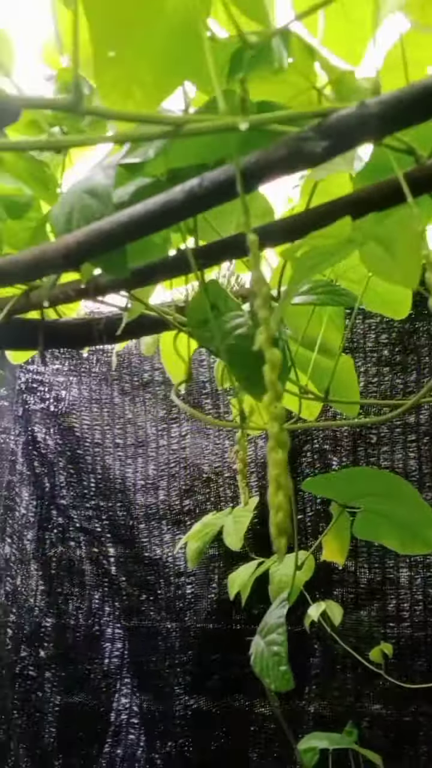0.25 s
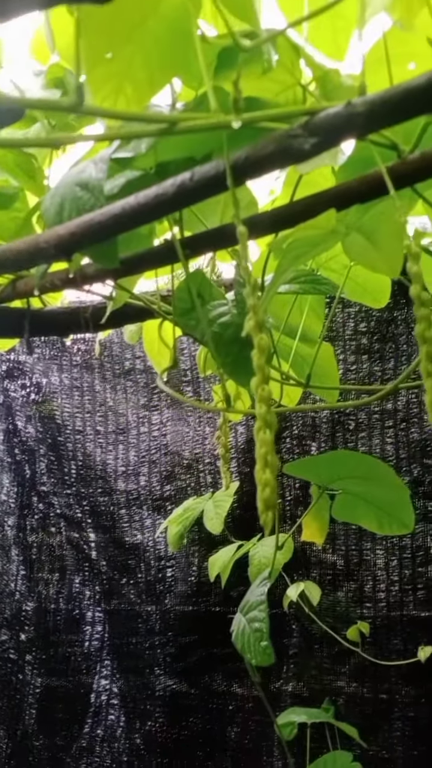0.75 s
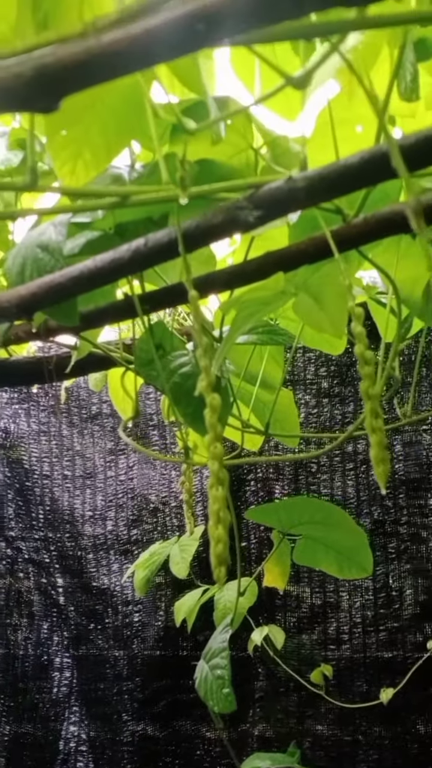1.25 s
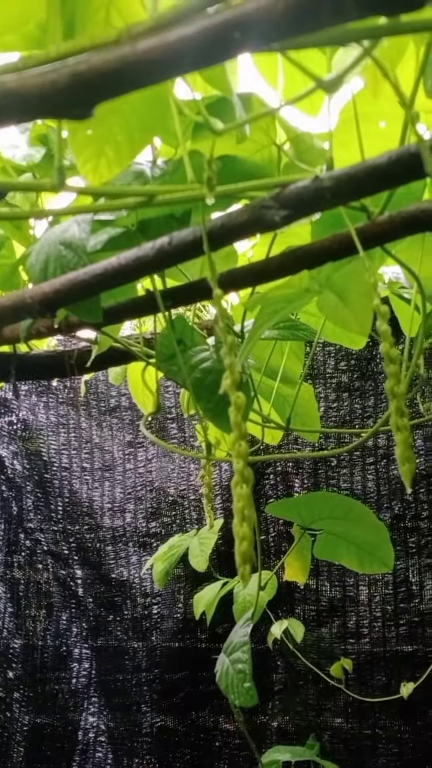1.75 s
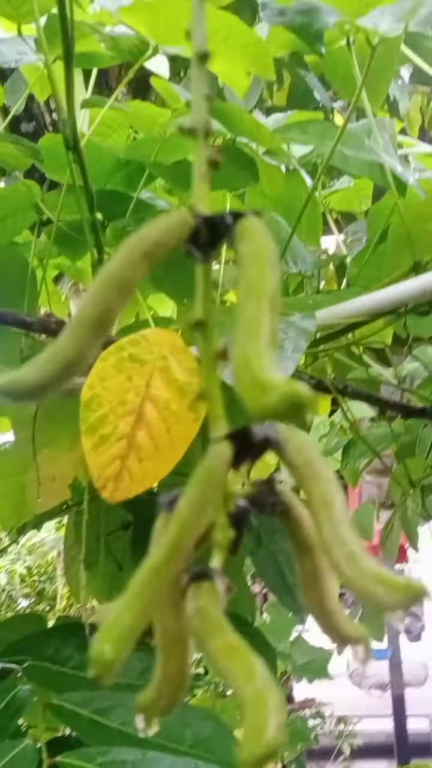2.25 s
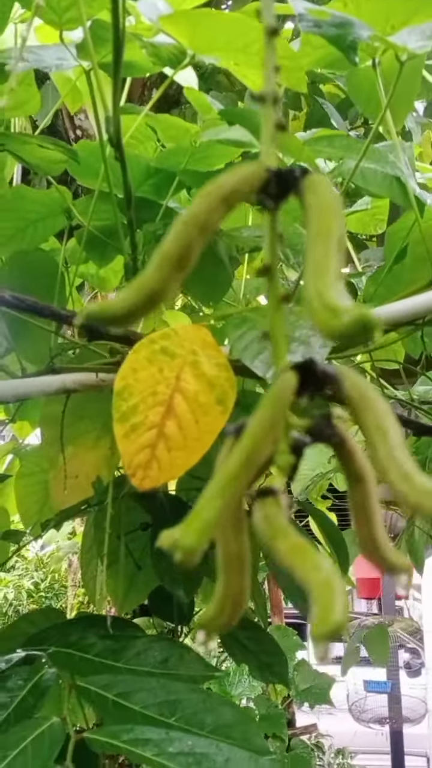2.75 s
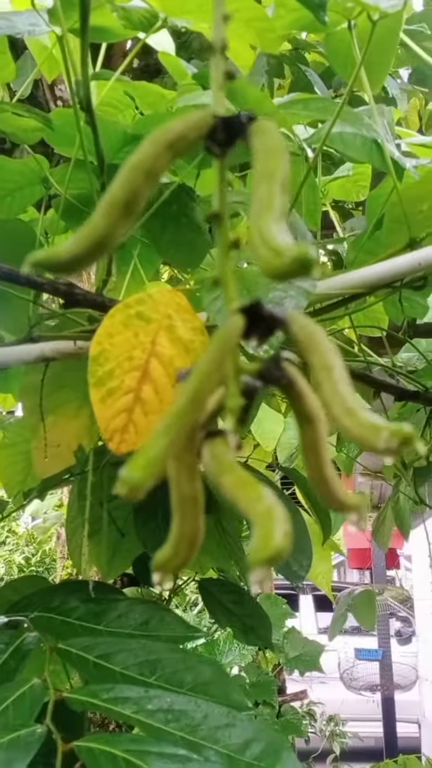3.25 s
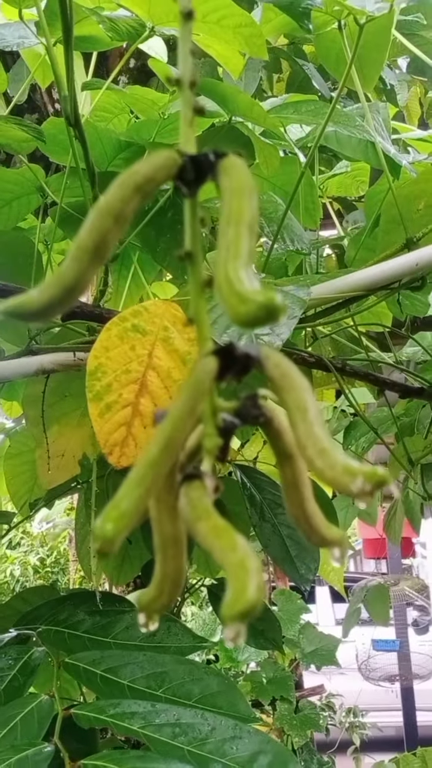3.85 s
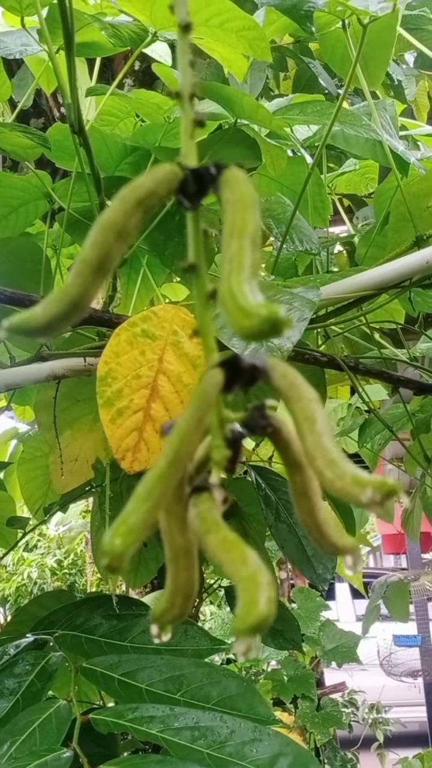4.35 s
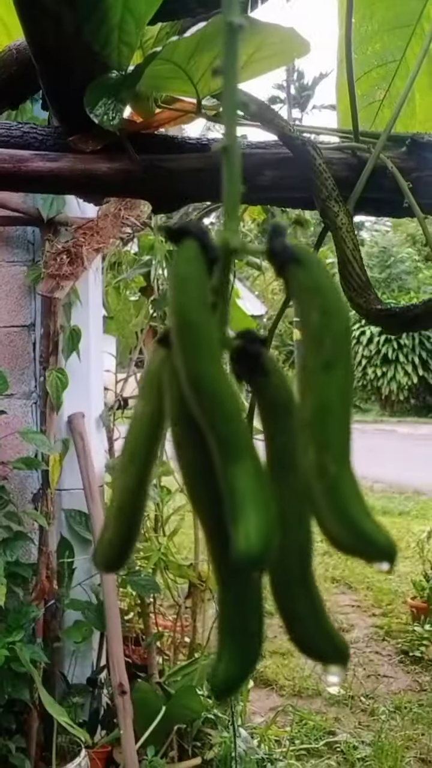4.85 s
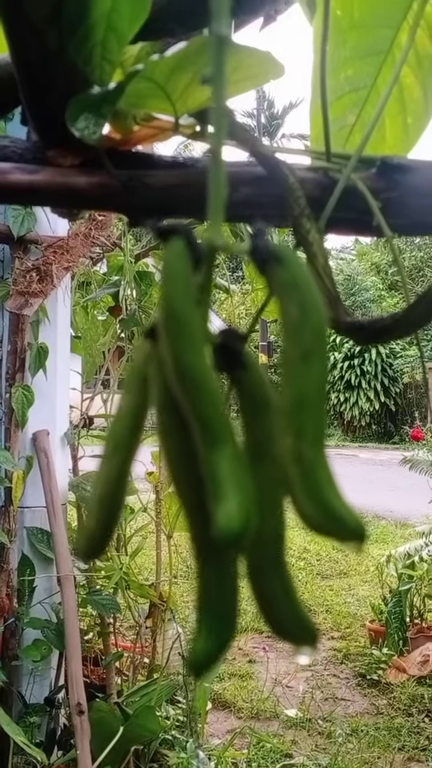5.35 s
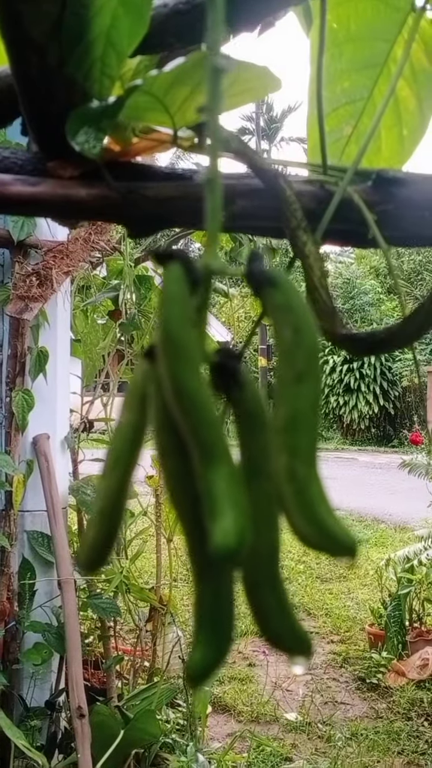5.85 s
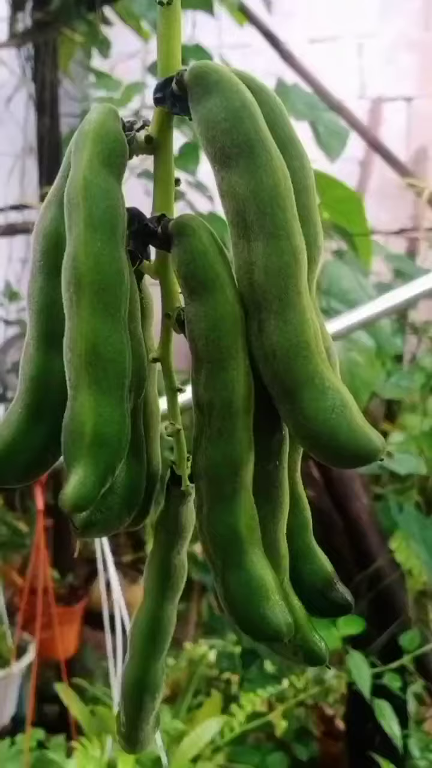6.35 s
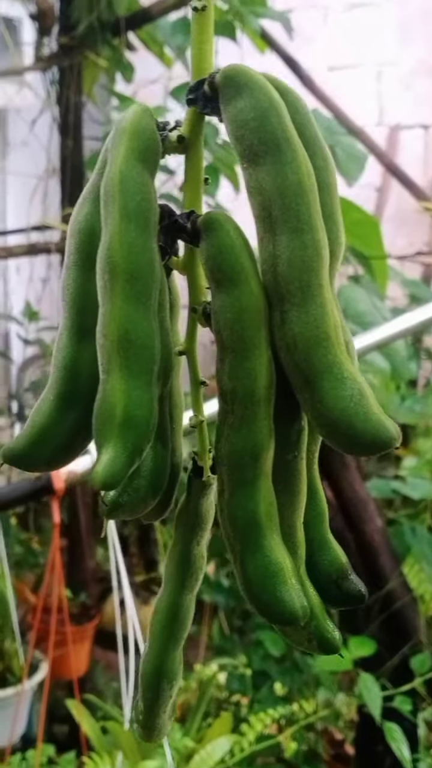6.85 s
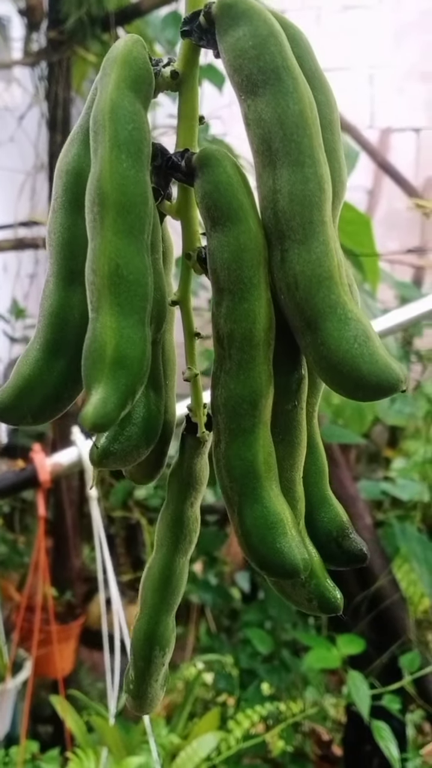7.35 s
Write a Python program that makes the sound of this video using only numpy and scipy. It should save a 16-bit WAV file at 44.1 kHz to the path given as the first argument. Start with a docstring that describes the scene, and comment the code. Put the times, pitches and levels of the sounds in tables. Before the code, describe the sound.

A cricket trills high and steady in a garden while songbirds whistle and scold, with three brief dropouts in the sound.

```python
"""A far insect chorus shimmers over a vegetable garden, then one cricket starts to trill close by,
each wing stroke ringing a falling tone. Songbirds whistle in pure arcs and scold with a rough voice
that rings in the throat; a distant rooster holds one sinking note. Underneath lie open air, a far road
and soft low bumps, and near the end a far engine starts to throb. The garden is heard from four spots
in turn, with a short silence and a fade-in between them."""
import sys
import numpy as np
from scipy import signal
from scipy.fft import rfft, irfft
from scipy.io import wavfile

SR = 44100
rng = np.random.default_rng(int(sys.argv[2]) if len(sys.argv) > 2 else 0)


def unload_audio(sound):
    """Save the sound as a 16-bit wav file, at the path given as the first command line argument."""
    columns = np.transpose(np.atleast_2d(sound))
    # keep every value between -1 and 1, then stretch to whole-number steps
    steps = np.round(np.clip(columns, -1, 1) * 32767)
    wavfile.write(sys.argv[1], SR, steps.astype(np.int16))


N = 335160
TIME = np.arange(N) / SR

# listening spots: start/s, end/s, fade-in/s, first wing stroke/s, stroke rate/Hz
LISTENING_SPOTS = [(-.1, 1.912, .02, .8042, 39.025), (2.107, 4.372, .22, 2.1054, 38.965),
                   (4.617, 6.181, .22, 4.6464, 38.9), (6.438, 7.7, .22, 6.4794, 39.175)]
# the cricket's four paths, direct and by leaves, wall and ground, a row per spot: delay/ms of each
PATH_DELAYS = [(0, 5.368, 10.43, 17.33), (0, 2.944, 6.551, 7.527), (0, 4.969, 8.358, 19.55),
               (0, 3.715, 22.068, 29.133)]
# the same paths: relative level/dB of each
PATH_LEVELS = [(11, 3.5, -16, -29.5), (-4, 1, -0.5, 2), (9.5, -14.5, -8.5, -2), (6, 0.5, 0.5, -6.5)]
# one wing stroke, slowing as it closes: t/ms from its middle, f/Hz, relative level/dB
WING_STROKE = [(-15, 6950, -32), (-6.5, 6850, -10), (-4.5, 6700, -5), (-1.7, 6660, -.5), (1.36, 6620, 0.5),
               (3, 6550, -7.5), (8, 6450, -8), (13, 6370, -34.5)]
# insects, a row per spot: cricket level/dB, its detune/Hz, its octave's relative level/dB, hiss level/dB
INSECT_MIX = [(-43, -5.5, -48, -71), (-46, -1, -62.5, -73), (-47, 14.5, -56.5, -83.5),
              (-48, 4, -55.5, -85.5)]
# whistled syllables: t/s, length/s, level/dB, first f/Hz, middle f/Hz, last f/Hz, warble/share of pitch
SONG_SYLLABLES = [ (.25, 0.19, -75, 3730, 3590, 3600, 0.012), (.43, 0.08, -83.5, 3900, 3870, 3890, 0),
                  (.95, 0.1, -76, 2230, 2120, 2000, 0.0095), (1.2, 0.098, -78.5, 3580, 3590, 3580, 0.013),
                  (1.385, 0.095, -78.5, 2530, 2420, 2250, 0.021),
                  (1.475, 0.098, -73.5, 2210, 2087, 2110, 0.021),
                  (1.62, 0.087, -77.5, 1865, 1810, 1680, 0.0076),
                  (2.12, 0.17, -72.5, 3500, 3460, 3360, 0.063), (2.42, 0.22, -81, 3570, 3466, 3460, 0.032),
                  (2.66, .22, -73, 3510, 3490, 3360, .06), (2.94, 0.1, -81.5, 1020, 968, 920, 0.01),
                  (3.15, .25, -67, 7500, 8000, 8570, 0.022), (3.772, 0.058, -56, 2800, 2852, 2950, 0.013),
                  (3.812, .026, -49.5, 2906, 3214, 2450, 0.012),
                  (4.028, .12, -46.5, 3124, 2763, 2220, 0.0046),
                  (4.145, 0.052, -58, 2290, 2246, 2320, 0.024),
                  (4.185, 0.056, -45, 2565, 2784, 2980, 0.0075),
                  (4.338, .05, -41.5, 3200, 3503, 3485, 0.0099),
                  (4.642, 0.046, -39, 3230, 3566, 3110, 0.011), (4.71, 0.066, -56, 1990, 2474, 2510, 0.023),
                  (4.77, 0.032, -58.5, 1447, 1502, 1400, .005), (4.86, 0.11, -63, 1507, 1468, 1473, 0.035),
                  (4.875, 0.032, -60.5, 2500, 2210, 1940, 0), (4.9, 0.032, -67, 850, 817, 795, 0.021),
                  (4.96, 0.034, -59, 1630, 1764, 1830, 0.0038),
                  (5.112, 0.023, -45, 4440, 4143, 3930, 0.027), (5.132, 0.023, -36, 3750, 3395, 3216, .008),
                  (5.156, .018, -42, 3260, 3194, 3140, .01), (5.176, .032, -38, 2900, 2860, 2663, 0.032),
                  (5.213, 0.026, -40.5, 2604, 3010, 2550, 0.027),
                  (5.245, 0.024, -39.5, 2573, 3335, 2700, 0.04), (5.275, 0.024, -37, 3030, 3584, 3150, 0),
                  (5.508, .062, -44, 2910, 2653, 2095, 0), (5.732, 0.11, -53, 1940, 2296, 2045, 0.0011),
                  (5.885, 0.021, -59, 2920, 2886, 2870, 0), (6.02, 0.047, -58, 2323, 2432, 2554, 0.0066),
                  (6.06, 0.12, -43.5, 2558, 2602, 2622, 0.0019), (6.505, 0.05, -45.5, 3260, 3486, 3080, 0),
                  (6.57, 0.076, -54.5, 2160, 2452, 2430, 0), (6.733, 0.054, -60, 2405, 2130, 1760, 0.0024),
                  (6.79, 0.085, -62.5, 1766, 1762, 1910, .015), (6.968, .016, -50, 3330, 4005, 4140, .01),
                  (6.982, .062, -40.5, 3905, 3230, 3085, 0.0077),
                  (7.048, 0.031, -51.5, 2970, 2834, 2500, 0.041),
                  (7.082, .026, -48.5, 2710, 3200, 2330, 0.048),
                  (7.115, 0.023, -46, 2950, 3380, 3110, 0.045),
                  (7.136, 0.019, -53, 3100, 3360, 4270, 0.031),
                  (7.365, 0.078, -54.5, 2950, 2500, 1790, 0.011)]
# harsh scolding notes: t/s, length/s, level/dB before the throat, brightest f/Hz, pitch/Hz
SCOLD_NOTES = [(.261, .11, -78, 4540, 1873), (1.194, .085, -81, 4500, 1905), (2.115, .092, -77, 4600, 2290),
               (2.604, 0.027, -60.5, 4500, 2153), (2.704, .17, -74, 4500, 2110),
               (3.086, .022, -64, 3820, 2037), (3.189, .04, -65, 4000, 1820),
               (3.291, 0.018, -60, 4100, 1762), (3.375, 0.04, -59, 4160, 2006),
               (3.458, 0.02, -54.5, 4550, 1868), (3.536, .018, -57, 4060, 1760),
               (3.646, 0.016, -55, 3970, 2063), (3.937, .055, -73.5, 3830, 1748),
               (4.136, .092, -59, 4660, 1771), (4.723, .023, -49.5, 5040, 1791),
               (4.838, .03, -47.5, 5200, 1890), (5.092, .027, -45, 5600, 1940),
               (5.205, .031, -53.5, 4940, 1634), (5.339, .03, -48, 5170, 1800),
               (5.427, .03, -47.5, 5260, 1810), (5.532, .025, -46.5, 5340, 1970),
               (5.667, 0.029, -46, 5060, 1928), (5.792, .026, -42.5, 5450, 1920),
               (5.879, .03, -45, 5520, 2013), (5.974, .036, -47.5, 5260, 2056),
               (6.099, 0.04, -50.5, 5500, 1963), (6.451, .018, -44.5, 5370, 1850),
               (6.552, .022, -49, 5600, 1890), (6.645, .024, -52.5, 5600, 1883),
               (6.746, 0.022, -50, 5370, 1893)]
# EQ of the scolding bird's throat and beak: f/Hz, gain/dB
THROAT_EQ = [(1000, -5.5), (2800, 3.5), (3300, 1.5), (3800, -2.5), (4120, -3), (4400, 5), (4750, 2.5),
             (5000, 0.5), (5300, -2.5), (5650, -1), (6100, 3), (6600, -1.5), (7300, -17), (8500, -13.5),
             (10000, -12), (12500, -9), (15500, -12.5)]
# envelopes of the rooster's two partials: t/s, first level/dB, second level/dB
CROW_ENVELOPES = [(4.7, -60, -72.5), (4.748, -62, -58.5), (4.888, -93.5, -77.5), (5.076, -60, -61.5),
                  (5.142, -67, -52.5), (5.238, -88.5, -76), (5.356, -87, -57.5), (5.396, -62, -52.5),
                  (5.54, -72.5, -64.5), (5.58, -59.5, -50.5), (5.62, -65, -67)]
# the hoarse fall that ends the crow: columns as in SONG_SYLLABLES
CROW_FALL = [(5.58, .07, -53, 830, 764, 715, 0.051), (5.65, 0.091, -63, 720, 711, 691, 0.022)]
# envelope of the far crickets: t/s, level/dB
CHORUS_ENVELOPE = [(0, -53.5), (.8, -54.5), (1.9, -49.5), (2.2, -59.5), (4.4, -58.5), (6.5, -54.5),
                   (7.6, -64.5)]
# colour of the far crickets: f/Hz, relative level/dB
CHORUS_SPECTRUM = [(4800, -55), (5250, -40), (5700, -31), (6100, -19), (6400, -5.5), (6700, -2), (6950, 3),
                   (7080, -16), (7300, -29.5), (7600, -53.5)]
# colour of the higher insects' hiss: f/Hz, relative level/dB
HISS_SPECTRUM = [(7100, -36.5), (7500, -11.5), (7800, -3), (8500, 7.5), (9000, -1), (9500, -18.5),
                 (10300, -7), (10900, -15.5), (11500, -33.5), (13800, -29.5), (15500, -26)]
# a thin, far insect tone: columns as in SONG_SYLLABLES
INSECT_WHINE = [(.05, 1.35, -87, 5260, 5160, 5258, .003), (1.45, .3, -76.5, 5258, 5240, 5250, .002)]
# a soft rustle: t/s, length/s, level/dB, centre f/Hz, half-width/octaves
RUSTLE_BANDS = [(3.101, 0.089, -72, 1210, 0.28), (3.099, 0.065, -71.5, 2200, 0.77)]
# the far road, a row per spot: level/dB, centre f/Hz
ROAD_RUMBLE = [(-86, 100), (-90, 210), (-85.5, 81), (-88.5, 140)]
# soft low bumps: t/s, length/s, level/dB before the trim, centre f/Hz
LOW_BUMPS = [(0.377, 0.037, -76.5, 113), (0.462, 0.07, -80, 102), (0.882, 0.029, -76, 132),
             (1.08, 0.14, -73.5, 124), (1.465, 0.055, -72.5, 127), (1.648, 0.1, -79.5, 116),
             (2.508, 0.034, -78, 117), (4.789, 0.086, -77, 99.0), (4.951, 0.027, -77, 111),
             (5.113, 0.07, -76.5, 116), (5.328, 0.084, -76.5, 98.1), (5.467, 0.076, -74, 94.6),
             (5.603, 0.037, -80, 98.2), (6.02, 0.089, -75.5, 130)]
# colour of the open air: f/Hz, relative level/dB
AIR_SPECTRUM = [(25, -17), (50, -7.5), (110, 0.5), (200, -3.5), (300, -5.5), (550, -10.5), (1300, -10.5),
                (2200, -16), (3700, -14.5), (5000, -17), (7500, -24), (12000, -32.5)]

CRICKET_START_S, CRICKET_STOP_S = .792, 7.43


def cricket(cold_soft_db=2.0):
    """The near trill starts a little soft; its reflections overlap differently at each spot."""
    out = np.zeros(N)
    padded = N + SR
    bin_hz = np.arange(padded // 2 + 1) * SR / padded
    for spot, delays_ms, paths_db, mix in zip(LISTENING_SPOTS, PATH_DELAYS, PATH_LEVELS, INSECT_MIX):
        start, end, _, first_s, rate_hz = spot
        level_db, detune_hz, octave_db, _ = mix
        trill = np.zeros(padded)
        for s in np.arange(first_s, min(end, TIME[-1]), 1 / rate_hz):
            stroke = wing_stroke(s, detune_hz, octave_db)
            at = int(s * SR) - len(stroke) // 2
            trill[at:at + len(stroke)] += stroke
        comb = sum(from_db(db) * np.exp(-2j * np.pi * bin_hz * ms / 1000)
                   for ms, db in zip(delays_ms, paths_db))
        reflected = irfft(rfft(trill) * comb, padded)[:N]
        here = (TIME > max(start, first_s - 1 / rate_hz)) & (TIME < end)
        out[here] = from_db(level_db) * rms_one(reflected[here])
    singing = gate(TIME, CRICKET_START_S, CRICKET_STOP_S, .003, .024)
    return out * singing * from_db(-cold_soft_db * cold(TIME, warm_up_s=.3))


def wing_stroke(s, detune_hz, octave_db, wander=.0024, tooth_jitter=.00074, uneven_db=.73, flat_hz=151):
    """The closing wing slows and rings a falling tone, flat while the cricket is cold."""
    ms = np.arange(-SR // 80, SR // 80) * 1000 / SR
    hz, db = curves(WING_STROKE, ms)
    bend = 1 + wander * rng.normal() + tooth_jitter * rng.standard_normal(len(ms))
    phase = phase_of(hz * bend + detune_hz - flat_hz * cold(s, warm_up_s=.17))
    tone = np.sin(phase) + from_db(octave_db) * np.sin(2 * phase)
    return from_db(db + uneven_db * rng.normal()) * tone * signal.windows.tukey(len(ms), .2)


def cold(t, warm_up_s):
    """1 as the cricket starts, dying away as it warms up."""
    return np.exp(-np.maximum(t - CRICKET_START_S, 0) / warm_up_s)


def whistles(notes, warble_hz=66, waver=.0067, overtone_db=-38, swell_db=9.5, db_per_octave=12.5):
    """Nearly pure tones, each bending along one arc; a fast vibrato makes some of them burry."""
    attack_s, release_s = .0044, .007
    out, unsteady = np.zeros(N), drift(160)
    vibrato = np.sin(phase_of(warble_hz * (1 + .15 * drift(20))))
    for s, length, db, first_hz, middle_hz, last_hz, depth in notes:
        span = around(s, s + length)
        u = np.clip(2 * (TIME[span] - s) / length - 1, -1, 1)  # -1 to 1 across the syllable
        hz = middle_hz + u * (last_hz - first_hz) / 2 + u ** 2 * ((first_hz + last_hz) / 2 - middle_hz)
        phase = phase_of(hz * (1 + depth * vibrato[span] + waver * unsteady[span]))
        tone = np.sin(phase) + from_db(overtone_db) * np.sin(2 * phase)
        effort_db = db_per_octave * np.log2(hz) - swell_db * u ** 2  # louder up high and mid-syllable
        envelope = gate(TIME[span], s + attack_s / 2, s + length, attack_s, release_s)
        out[span] += np.sqrt(2) * from_db(db + effort_db - effort_db.max()) * envelope * tone
    return out


def scolds(arch=.04, rough=.024, rasp=.3, rattle_hz=430, throat_octaves=.27):
    """A rough voice, arching in pitch and rattling in level, rings in the bird's throat."""
    out, jitter = np.zeros(N), drift(440)
    rattle = 1 + np.sin(phase_of(rattle_hz * (1 + .1 * drift(30))))
    for s, length, db, bright_hz, pitch_hz in SCOLD_NOTES:
        span = around(s, s + length)
        t = TIME[span]
        bow = np.sin(np.pi * np.clip((t - s) / length, 0, 1)) - 2 / np.pi
        phase = phase_of(pitch_hz * (1 + arch * bow + rough * jitter[span]))
        overtones = sum(np.sin(k * phase) for k in range(2, 5))
        voice = rms_one(resonate(rattle[span] * overtones, bright_hz, throat_octaves))
        hiss = rng.standard_normal(len(t))
        breath = rms_one(resonate(hiss, bright_hz, throat_octaves))
        low_db = -6.5 - 38.5 * np.log2(bright_hz / 4200)  # brighter notes have a weaker fundamental
        fundamental = from_db(low_db) * (.54 + .25 * rattle[span]) * np.sin(phase)
        edge_db = -22 + .7 * (db + 46.5)  # louder notes have a sharper edge
        note = rms_one(voice + rasp * breath) + fundamental + from_db(edge_db) * hiss
        out[span] += from_db(db) * note * gate(t, s + .011, s + length, .0078, .013)
    throat_db, = curves(THROAT_EQ, np.arange(N // 2 + 1) * SR / N)
    return irfft(rfft(out) * from_db(throat_db), N)


def rooster(start_s=4.62, end_s=5.615, pitch_hz=977, sag_hz=92.2, waver=.006):
    """One note that sinks ever faster, thinned to two partials by distance, then a hoarse fall."""
    first_db, second_db = curves(CROW_ENVELOPES)
    spent = np.clip((TIME - start_s) / (end_s - start_s), 0, 1)
    phase = phase_of((pitch_hz - sag_hz * spent ** 2.3) * (1 + waver * drift(50)))
    held = from_db(first_db) * np.sin(phase) + from_db(second_db) * np.sin(2 * phase)
    held *= np.sqrt(2) * gate(TIME, start_s, end_s, .023, .14)
    return held + whistles(CROW_FALL, warble_hz=44.8, waver=.021, overtone_db=-20.5)


def far_insects(trill_hz=39.3, trill_depth=.23, throb_hz=7.3, throb_depth=.39):
    """Many far trills blur into a pulsing bed; higher insects throb above it and one whines thinly."""
    trill = 1 + trill_depth * np.sin(phase_of(trill_hz + .5 * drift(5.5)))
    throb = 1 + throb_depth * np.sin(phase_of(throb_hz + .5 * drift(5)))
    chorus_db, = curves(CHORUS_ENVELOPE)
    *_, hiss_db = by_spot(INSECT_MIX)
    chorus = from_db(chorus_db) * rms_one(trill * noise(CHORUS_SPECTRUM))
    hiss = from_db(hiss_db) * rms_one(throb * noise(HISS_SPECTRUM))
    return chorus + hiss + whistles(INSECT_WHINE, waver=.011)


def far_engine(start_s=6.89, level_db=-64.5, pitch_hz=81, climb_hz_per_s=6.1, stumble_hz=2, throb_hz=12):
    """One low, throbbing note that climbs as the engine slowly speeds up."""
    hz = pitch_hz + climb_hz_per_s * (TIME - start_s) + stumble_hz * drift(20)
    throb = 1 + .44 * (np.sin(phase_of(throb_hz + drift(3.8))) + .5 * drift(15))
    running = gate(TIME, start_s, TIME[-1], .067, .067)
    return np.sqrt(2) * from_db(level_db) * running * throb * np.sin(phase_of(hz))


def rustles(rows):
    """Brief soft swells of band-passed noise."""
    out = np.zeros(N)
    for s, length, db, hz, octaves in rows:
        span = around(s, s + length)
        hiss = rms_one(resonate(rng.standard_normal(len(TIME[span])), hz, octaves))
        out[span] += from_db(db) * hiss * gate(TIME[span], s, s + length, .0077, .019)
    return out


def low_bumps(trim_db=-1, octaves=.25):
    """Dull, soft bumps of low noise."""
    return from_db(trim_db) * rustles([(*bump, octaves) for bump in LOW_BUMPS])


def far_road(spread_hz=44, swell_db=2.5, swell_hz=4):
    """Distant traffic: a narrow band of rumble that swells and ebbs."""
    level_db, centre_hz = by_spot(ROAD_RUMBLE)
    phase = phase_of(centre_hz)
    band = drift(spread_hz) * np.sin(phase) + drift(spread_hz) * np.cos(phase)
    rumble = from_db(level_db) * rms_one(band * from_db(swell_db * drift(swell_hz)))
    return resonate(rumble, hz=130, octaves=1.7)


def open_air(level_db=-80):
    """Still air: a faint, steady bed of noise."""
    return from_db(level_db) * noise(AIR_SPECTRUM)


def garden_echo(x, near_db, far_db, near_t60_s=.1, far_t60_s=.53, predelay_s=.0051):
    """Leaves and walls close by scatter a quick echo, trees farther off a longer tail."""
    t = TIME[:SR]
    response = np.zeros(SR)
    for db, t60 in (near_db, near_t60_s), (far_db, far_t60_s):
        scatter = rng.standard_normal(SR) * (t > predelay_s) * 1000 ** (-t / t60)
        response += from_db(db) * scatter / np.linalg.norm(scatter)
    return x + signal.fftconvolve(x, response)[:N]


def from_db(db):
    """Decibels to gain."""
    return 10 ** (np.asarray(db) / 20)


def rms_one(x):
    """Scale to an rms of 1."""
    return x / np.sqrt(np.mean(x ** 2) + 1e-20)


def curves(rows, at=TIME):
    """A table's columns as breakpoint curves along its first one."""
    points, *columns = np.transpose(rows)
    return [np.interp(at, points, column) for column in columns]


def by_spot(rows):
    """A table's columns, each row held while its spot is heard."""
    spot = np.searchsorted([start for start, *_ in LISTENING_SPOTS], TIME) - 1
    return np.array(rows)[spot].T


def drift(rate_hz):
    """A random modulator of rms 1, rolled off above rate_hz."""
    hz = np.arange(N // 2 + 1) * SR / N
    return rms_one(irfft(rfft(rng.standard_normal(N)) / (1 + (hz / rate_hz) ** 2), N))


def noise(colour):
    """Noise of rms 1 shaped by rows of f/Hz, level/dB, silent beyond their ends."""
    hz, db = np.transpose(colour)
    bin_hz = np.arange(1, N // 2 + 2) * SR / N
    gain = from_db(np.interp(np.log(bin_hz), np.log(hz), db, left=-np.inf, right=-np.inf))
    return rms_one(irfft(rfft(rng.standard_normal(N)) * gain, N))


def phase_of(hz):
    """Running phase of a moving pitch."""
    return 2 * np.pi * np.cumsum(hz) / SR


def resonate(x, hz, octaves):
    """A band-pass reaching the given octaves to each side of hz."""
    edges = np.clip([hz / 2 ** octaves, hz * 2 ** octaves], 10, SR / 2 - 10)
    return signal.sosfilt(signal.butter(2, edges, "band", fs=SR, output="sos"), x)


def gate(t, start, end, rise, fall):
    """1 between start and end, with smooth fades outside."""
    edge = np.clip(np.minimum((t - start) / rise, (end - t) / fall) + 1, 0, 1)
    return np.sin(np.pi / 2 * edge) ** 2


def around(start, end):
    """The samples of a sound, with 50 ms handles."""
    return slice(max(int((start - .05) * SR), 0), int((end + .05) * SR))


def scene():
    """The mono mix: cricket and birds, each with its own echo sends, over the background beds."""
    insects = garden_echo(cricket(), near_db=-10, far_db=-13) + far_insects()
    songs = garden_echo(whistles(SONG_SYLLABLES), near_db=-6, far_db=-8)
    scolding = garden_echo(scolds() + rustles(RUSTLE_BANDS), near_db=-3, far_db=-6, near_t60_s=.15)
    crow = garden_echo(rooster(), near_db=-15, far_db=-15)
    background = far_road() + far_engine() + open_air() + low_bumps()
    return (insects + songs + scolding + crow + background)[None]


def record(dry, opening_gain=.045, stopband_hz=16200):
    """Each spot fades in and ends on a hard cut; a steep low-pass takes off the very top."""
    fader = np.zeros(N)
    for start, end, fade_s, *_ in LISTENING_SPOTS:
        here = (TIME >= start) & (TIME < end)
        fader += here * np.clip(opening_gain + (TIME - start) / fade_s, 0, 1)
    return signal.sosfilt(signal.cheby2(14, 60, stopband_hz, fs=SR, output="sos"), dry * fader)


dry = scene()
out = record(dry)
unload_audio(out)
```